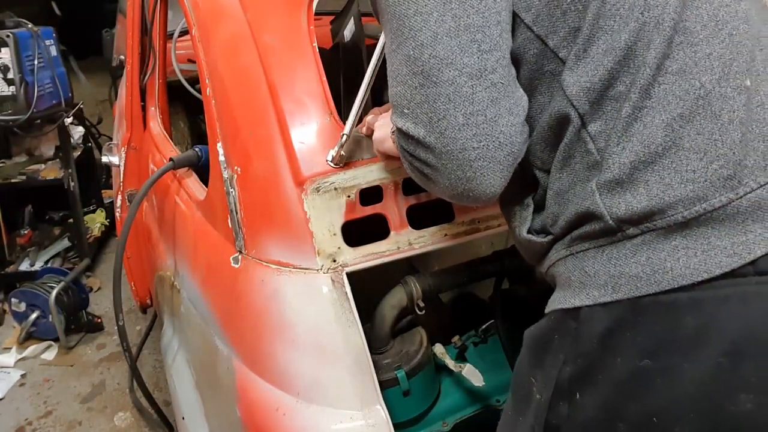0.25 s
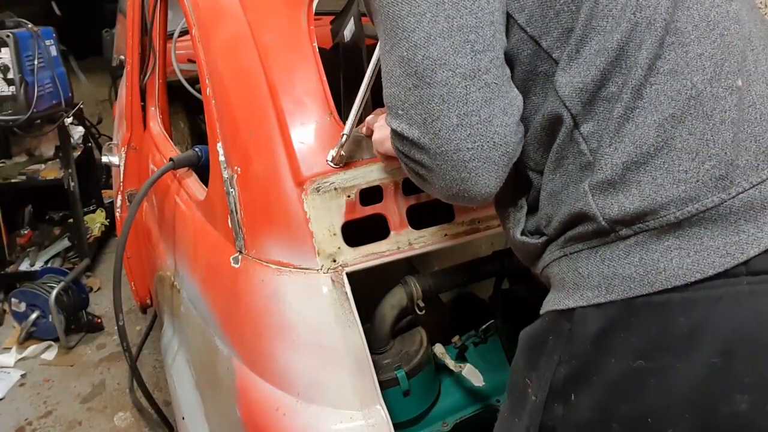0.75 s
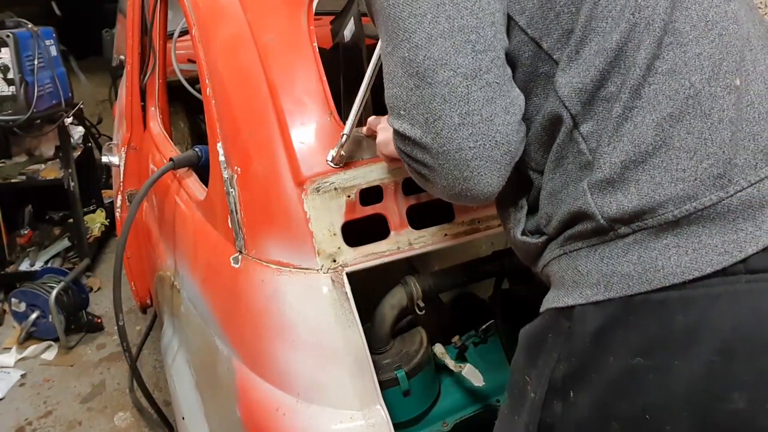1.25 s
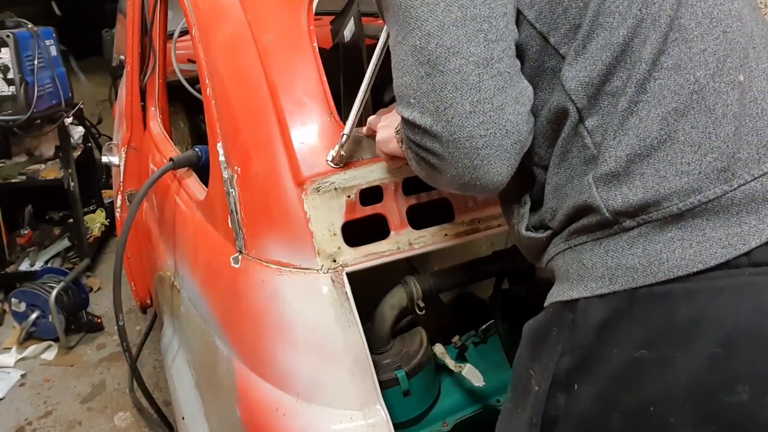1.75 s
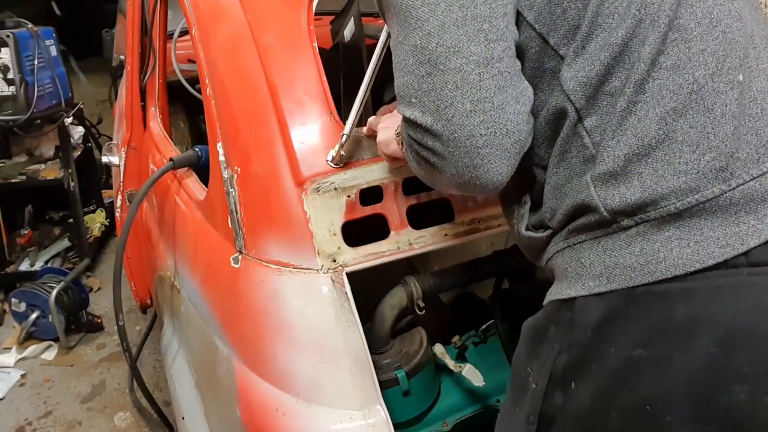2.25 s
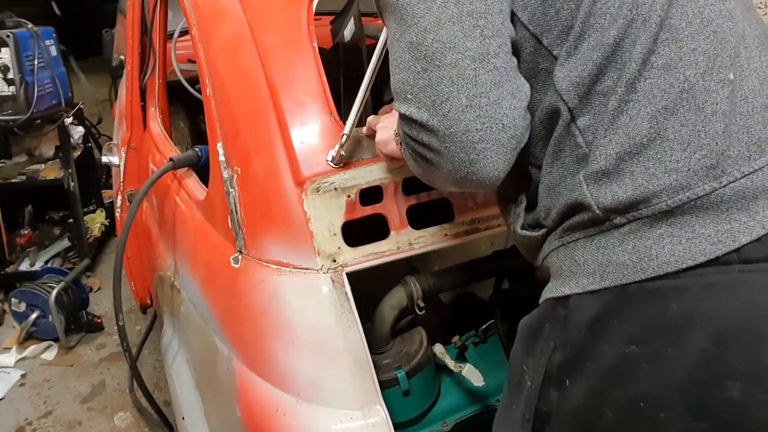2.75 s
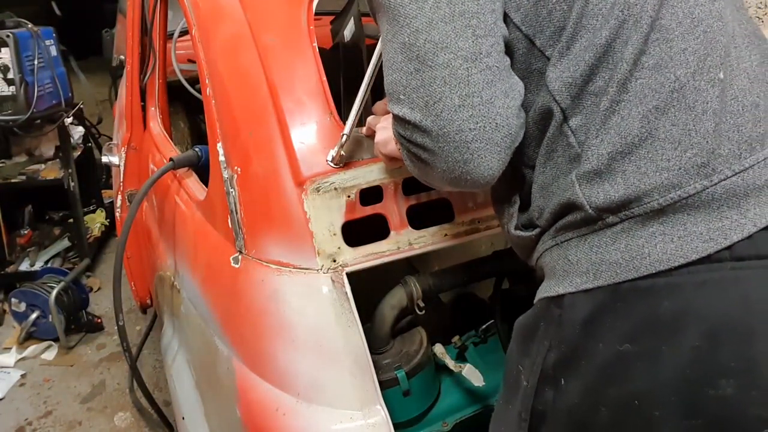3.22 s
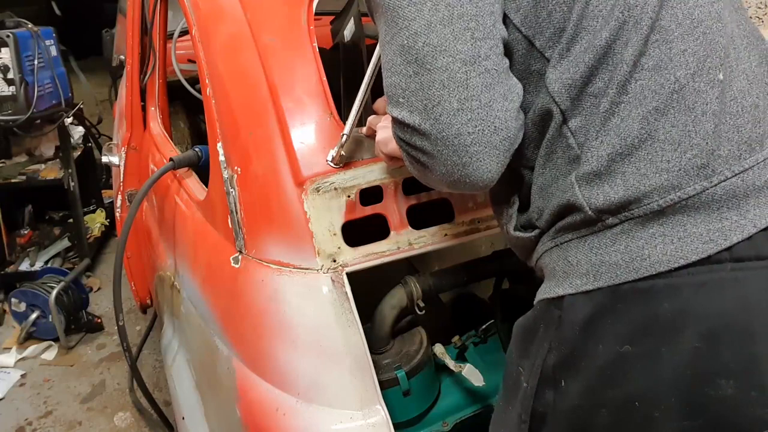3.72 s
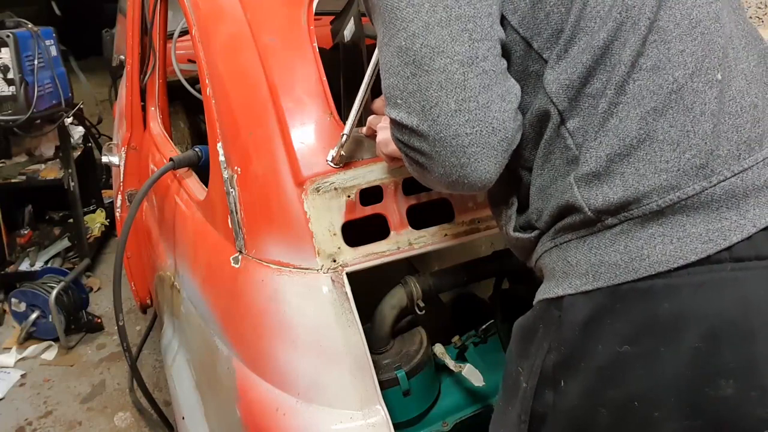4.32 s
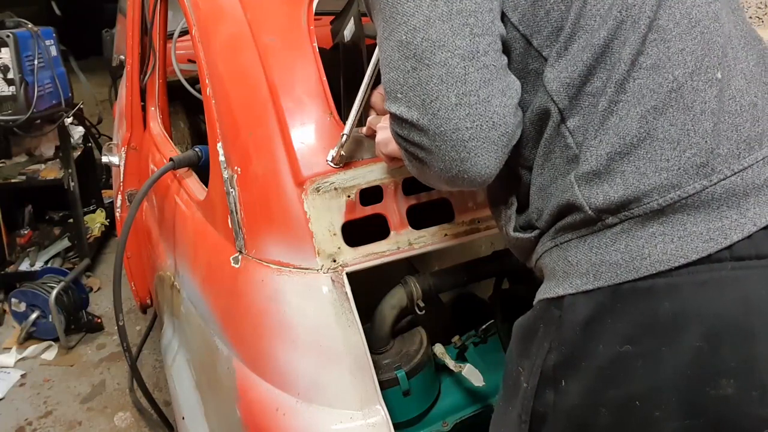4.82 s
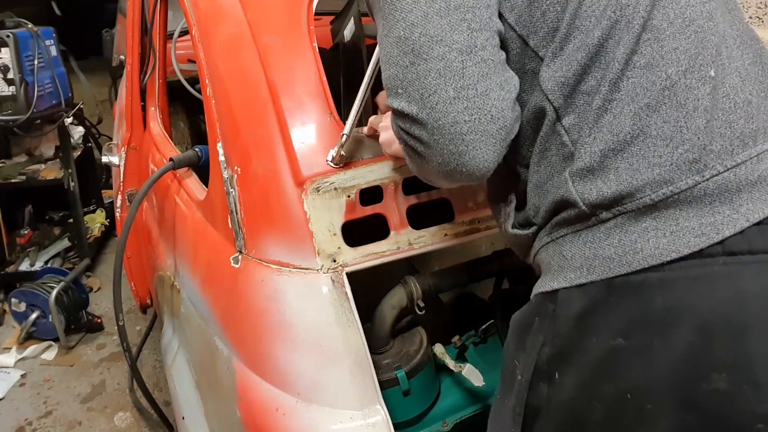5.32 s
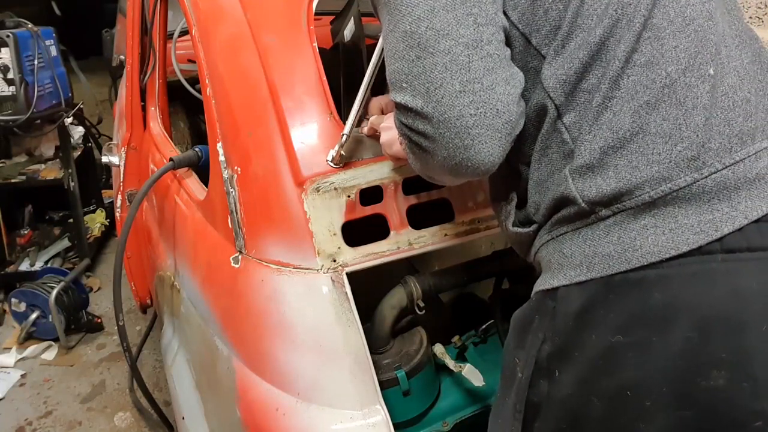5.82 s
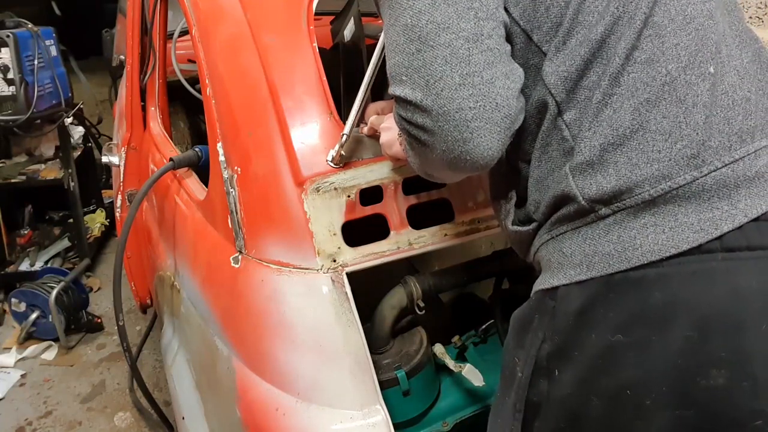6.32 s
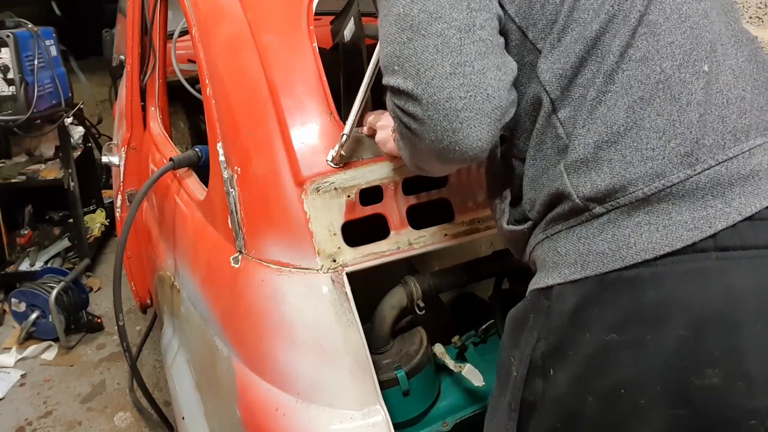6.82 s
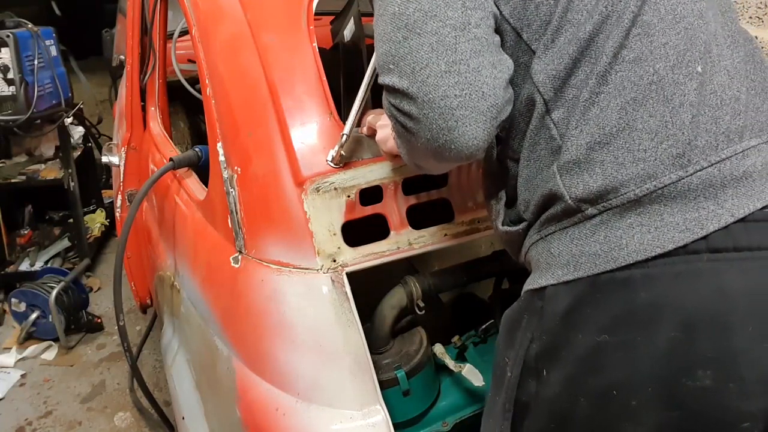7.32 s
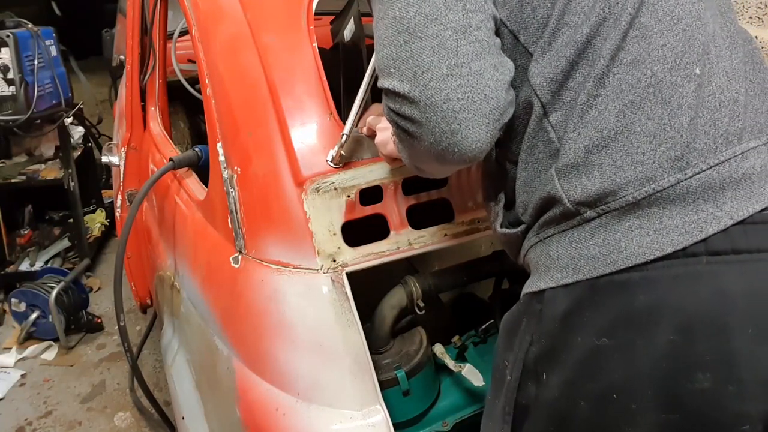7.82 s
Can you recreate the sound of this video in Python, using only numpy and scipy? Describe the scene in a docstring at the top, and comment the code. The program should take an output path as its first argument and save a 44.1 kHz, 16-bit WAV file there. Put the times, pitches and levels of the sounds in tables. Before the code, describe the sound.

Short dry strokes of a hard metal point stick and slip on thin steel, each with a crack or rasp and a brief boxy panel ring. They come in irregular clusters, separated by near-quiet gaps with only soft room air and low rumble. Weak scuffs lead to strong, fuller scrapes and a rapid stutter in the last second or so. Near stereo pickup indoors, a touch left of centre.

```python
"""Steel scribe on a car body

In a small workshop a steel scribe is worked along the edge of a sheet steel patch on a car body, a little left.
Its point sticks and slips in short strokes and snaps free with a crack; each slip is a push that rings the panel.
Filtered noise makes the rest: the car body shudders with the panel's low swing, over a low rumble
and a soft rush of workshop air, with a faint hiss that sinks away in the first second or so."""
import sys
import numpy as np
from scipy import signal
from scipy.fft import rfft, irfft
from scipy.io import wavfile
from scipy.ndimage import uniform_filter1d

SR = 44100
rng = np.random.default_rng(int(sys.argv[2]) if len(sys.argv) > 2 else 0)


def wrap_up_sound(samples):
    """Save the sound to the file named by the first command line argument, as 16-bit audio."""
    columns = np.atleast_2d(samples).T
    # keep every value between -1 and 1, then stretch to whole-number steps
    tamed = np.clip(columns, -1, 1)
    steps = np.round(tamed * 32767).astype(np.int16)
    wavfile.write(sys.argv[1], SR, steps)


N = 355446

# Likeness of left and right at the stereo microphone. Each row: frequency in Hz, coherence from 0 to 1.
COHERENCE = [(60, .93), (130, .94), (290, 0.88), (640, 0.53), (1300, 0), (2000, 0.21), (3100, 0.0084),
             (7000, 0.083), (15000, 0)]
# Colour of the low rumble, and of the car body's shudder. Each row: frequency in Hz, relative level in dB per Hz.
RUMBLE_SPECTRUM = [(10, -22.5), (25, -16.5), (50, 6), (70, -1), (95, 1), (140, -6), (250, -35),
                   (600, -66.5)]


def amp(db):
    """Decibels to gain."""
    return 10 ** (np.asarray(db) / 20)


def unit(x):
    """Scales a sound to energy 1."""
    return x / np.sqrt(np.sum(x ** 2) + 1e-20)


def read(points, hz):
    """Reads a table on a log-frequency axis."""
    f, value = np.transpose(points)
    return np.interp(np.log(hz + 1), np.log(f + 1), value)


def follow(curve):
    """A level curve of (s, dB) points as a gain for every sample."""
    return amp(np.interp(np.arange(N) / SR, *np.transpose(curve)))


def hump(hz, centre_hz, octaves):
    """A broad resonance of height 1."""
    return np.exp(-(np.log2(hz / centre_hz) / octaves) ** 2)


def add(mix, s, sound):
    """Adds a stereo sound at time s, cut off at the end of the mix."""
    part = mix[:, round(s * SR):][:, :sound.shape[1]]
    part += sound[:, :part.shape[1]]


def causal(gain_db, size=2048):
    """The minimum-phase impulse response with this gain: its energy comes as early as possible."""
    cepstrum = irfft(np.log(amp(gain_db)))
    half = len(cepstrum) // 2
    folded = np.r_[cepstrum[0], 2 * cepstrum[1:half], np.zeros(half)]
    return irfft(np.exp(rfft(folded)))[:size]


def pair(a, b, hz):
    """Two unrelated spectra become left and right, alike in the bass."""
    same = read(COHERENCE, hz)
    mid = np.sqrt((1 + same) / 2) * a
    side = np.sqrt((1 - same) / 2) * b
    return np.array([mid + side, mid - side])


def noise(spectrum):
    """Steady stereo noise of rms 1, coloured by a spectrum."""
    hz = np.fft.rfftfreq(N, 1 / SR)
    left, right = rfft(rng.standard_normal((2, N)))
    x = irfft(pair(left, right, hz) * amp(read(spectrum, hz)), N)
    return x / x.std()


def background(air_db=-65.5):
    """Low rumble of moving level, steady soft air, and a faint hiss that soon sinks away, all coloured noise."""
    # Each row of the two spectra: frequency in Hz, relative level in dB per Hz.
    air_spectrum = [(100, -3.5), (200, -6.5), (350, -4.5), (600, 1), (1000, 1), (1300, -2), (1600, -15),
                    (2100, -20.5), (2550, -20), (4000, -24.5), (6500, -24), (9000, -33.5), (12500, -21),
                    (15000, -45.5)]
    hiss_spectrum = [(300, -9), (650, 10.5), (1250, 17), (1700, -2), (2250, -3), (2520, 0.5), (3000, -6),
                     (6000, -1), (8000, -5), (9200, -0.5), (9650, -1), (10200, -3), (11500, 0),
                     (16000, -18)]
    # Rumble and hiss over time. Each row: time in seconds, rms level in dB.
    rumble_level = [(0, -62), (1.1, -69.5), (2.7, -61.5), (3.3, -58.5), (3.6, -65.5), (6.5, -66.5),
                    (8, -65.5)]
    hiss_level = [(0, -61.5), (.3, -64.5), (.45, -70), (.9, -69.5), (1.3, -102)]
    rumble = follow(rumble_level) * noise(RUMBLE_SPECTRUM)
    air = amp(air_db) * noise(air_spectrum)
    hiss = follow(hiss_level) * noise(hiss_spectrum)
    return rumble + air + hiss


def shudder(scribe, panel_hz=400, hardest_db=-46.5, db_per_db=0.57, settle_s=0.016):
    """The whole car body rumbles with the low swing of the panel, and settles after it."""
    lowpass = signal.butter(2, panel_hz, fs=SR, output="sos")
    swing = signal.sosfilt(lowpass, scribe.mean(0))
    keep = np.exp(-1 / (settle_s * SR))
    push = np.sqrt(signal.lfilter([1 - keep], [1, -keep], swing ** 2))
    return amp(hardest_db) * (push / push.max()) ** db_per_db * noise(RUMBLE_SPECTRUM)


def dense_ring(build_cycles=2.6, second_db=-35.02, second_stretch=0.71, size=32768):
    """Countless panel modes and wall echoes: the bass builds up slowly and dies last."""
    # Decay of panel and room together. Each row: frequency in Hz, time to fall by 60 dB in seconds.
    decay = [(120, 0.42), (300, 0.24), (700, .26), (2000, 0.22), (5000, 0.19), (10000, .18), (16000, 0.11)]
    hz, t, z = signal.stft(rng.standard_normal((2, size)), SR, nperseg=256)
    hz = hz[:, None]
    fall_db = -60 * t / read(decay, hz)
    fall = amp(fall_db) + amp(second_db + fall_db / second_stretch)  # the second, fainter part dies sooner
    build = 1 - np.exp(-(t + 0.0011) * (hz + 50) / build_cycles)
    ring = rfft(signal.istft(z * fall * build, SR, nperseg=256)[1][:, :size])
    ring /= np.sqrt(uniform_filter1d(abs(ring) ** 2, size=200, axis=1))  # every band carries the same energy
    fade = np.clip(np.linspace(3, -1, size), 0, 1)  # the last of the tail closes to silence
    return irfft(pair(*ring, np.fft.rfftfreq(size, 1 / SR))) * fade


def clear_modes(size=32768):
    """The clear modes of the panel: dying sines, met with another phase at every spot and at each ear."""
    # Each row: frequency in Hz, relative level in dB, time to fall by 60 dB in seconds.
    modes = [(173.7, -51.5, 0.54), (241.4, -49.5, 0.2), (304.8, -50, 0.46), (431, -60, 0.25),
             (526, -59.5, 0.97), (600, -53.5, 0.53), (760, -57.5, 0.7), (868, -48, 0.22), (1090, -47, 0.16),
             (1158, -55.5, 0.59), (1554, -40, .25), (1820, -53, 0.44), (1950, -47.5, 0.13),
             (2154, -32, 0.2), (2290, -64.5, 0.8), (2830, -46.5, 0.083), (3220, -55.5, 0.22),
             (3840, -47.5, 0.3)]
    t = np.arange(size) / SR
    out = np.zeros((2, size))
    phases = rng.uniform(-np.pi, np.pi, (len(modes), 2))
    for (hz, db, t60), (phase, apart) in zip(modes, phases):
        ears = np.array([[0], [apart * (1 - read(COHERENCE, hz))]])
        out += amp(db - 60 * t / t60) * np.sin(2 * np.pi * hz * t + phase + ears)
    return out


def spots(shared=0.24, direct=0.18, modes_db=-12.5, count=8):
    """Responses of several spots on the panel: the direct click, then a ring that is partly common to all."""
    common = dense_ring()
    responses = []
    for _ in range(count):
        ring = np.sqrt(shared) * common + np.sqrt(1 - shared) * dense_ring()
        response = ring + amp(modes_db) * clear_modes()
        response[:, 0] += direct
        responses.append(response)
    return responses


def radiate(force, response, s, db, sharp_db, boom_db, contact_hz, shaft_db,
            sharp_hz=3000, shaft_hz=3600, bass_hz=450, ripple_db=1.59, scribe_hz=1950):
    """The force rings a spot; edge hardness tilts the treble, and panel, contact and shaft resonances colour it."""
    # What the panel radiates for one slip. Each row: frequency in Hz, relative level in dB.
    panel = [(40, 0.5), (110, 6.5), (170, 15.5), (300, 26), (550, 23.5), (900, 24), (1900, 19.5),
             (3500, 14), (5500, 10.5), (8800, 3), (12000, 6), (15500, -1)]
    # The boom changes pitch as the point travels along the edge. Each row: time in seconds, pitch in Hz.
    boom_pitch = [(1.8, 190), (2.2, 247), (4.3, 212.5), (6, 303), (7, 325), (7.3, 257), (7.8, 230)]
    ring = signal.fftconvolve(unit(force)[None], response, axes=1)
    hz = np.fft.rfftfreq(4096, 1 / SR) + 1
    bass = 1 / (1 + (hz / bass_hz) ** 4)
    # the bass follows the push of the hand, however the single slips happen to fall
    power = (abs(rfft(ring, 32768)) ** 2).mean(0)
    steady = -10 * np.log10(uniform_filter1d(power, size=96)[::8] + 1e-9) * bass
    # higher up, a random ripple makes the colour of every event slightly uneven
    ripple = uniform_filter1d(rng.standard_normal(len(hz)), size=30)
    ripple = ripple_db * (1 - bass) * ripple / ripple.std()
    sharp = sharp_db * np.log(1 + (hz / sharp_hz) ** 2) / np.log(17)  # reaches sharp_db at four times sharp_hz
    boom = boom_db * hump(hz, np.interp(s, *np.transpose(boom_pitch)), octaves=1.226)
    # the contact spot rings more where it meets the scribe's own note
    contact_db = 5 + 3.5 * hump(contact_hz, scribe_hz, octaves=0.99)
    contact = contact_db * hump(hz, contact_hz, octaves=0.46)
    shaft = shaft_db * hump(hz, shaft_hz, octaves=0.42)
    colour = causal(db + read(panel, hz) + steady + ripple + sharp + boom + contact + shaft)
    return signal.fftconvolve(ring, colour[None], axes=1)


def stick_slip(t, slips_per_s, grit, uneven=0.55, spread_db=5.0, grit_s=0.0013):
    """Uneven slips of the point, each followed by a short spray of grit, over a steady scrape."""
    gap, size = rng.standard_normal((256, 2)).T
    gap_samples = np.exp(uneven * gap[1:]) * SR / slips_per_s  # slips_per_s sets the median gap
    at = np.r_[0, np.cumsum(gap_samples)].astype(int)
    inside = at < len(t)
    slips = np.zeros(len(t))
    slips[at[inside]] = amp(spread_db * np.clip(size, -2, 2))[inside]
    spray_level = signal.fftconvolve(slips, np.exp(-t / grit_s))[:len(t)] + 0.28  # 0.28 is the steady scrape
    spray = spray_level * rng.standard_normal(len(t))
    # grit is the share of the energy in the spray
    return np.sqrt(1 - grit) * unit(slips - slips.mean()) + np.sqrt(grit) * unit(spray)


def snaps(responses, crack=0.79):
    """The point breaks free with one crack and skids to a halt, its slips dying away."""
    # Each row: start in seconds, decay time of the skid in seconds, level in dB, sharpness in dB,
    # boom in dB, contact resonance in Hz, shaft resonance in dB.
    snap_rows = [(1.131, 0.0093, -32, -7.5, 9, 670, 8.5), (1.264, 0.013, -11.5, 2.5, 8, 9800, 5),
                 (1.745, 0.0081, -14.5, 16, 7.5, 277, 8.5), (2.151, 0.015, -36, -11, 23.5, 690, -12),
                 (2.356, .008, -45, 8, 10, 6240, 9), (2.594, 0.029, -27.5, -7.5, 0, 6200, -0.5),
                 (3.021, 0.065, -33.5, 0.5, 15, 720, -0.5), (3.125, 0.013, -34, 0, 17.5, 790, -1),
                 (3.166, 0.0085, -33.5, -9.5, 12.5, 1440, 0), (3.228, 0.029, -28, -19, 5.5, 1690, -7),
                 (3.762, 0.033, -27.5, 1, 16.5, 5560, 9.5), (3.8, 0.019, -22, 8, 8, 3020, 2),
                 (3.82, .0085, -14, 15.5, 11.5, 2130, 2), (4.006, 0.021, -31, -5.5, 22, 6720, -2),
                 (4.23, 0.015, -28, -1, 14, 7050, 12.5), (4.531, 0.045, -19, -4, 16, 2820, 0),
                 (4.589, 0.024, -11.5, 8, 3.5, 5980, 1.5), (5.614, 0.021, -51.5, 27.5, -5, 5900, -1),
                 (6.264, 0.022, -22, -5, -6.5, 1960, -4), (6.903, 0.022, -10, -21.5, 4, 2490, -4)]
    out = np.zeros((2, N))
    for k, (s, skid, *touch) in enumerate(snap_rows):
        t = np.arange(0, 4 * skid, 1 / SR)
        force = unit(np.exp(-t / skid) * stick_slip(t, slips_per_s=400, grit=0.62))
        force[0] += crack
        add(out, s, radiate(force, responses[k % len(responses)], s, *touch))
    return out


def judder(count=5, start_s=7.234, period_s=0.058, swell_s=0.014, fade_s=0.023):
    """The point sticks and jerks on at a steady rate: a run of like strokes under one arch of pressure."""
    jerks = []
    for k, arch in enumerate(np.hanning(count) ** 2):
        level_db = -15.5 + 1.5 * arch  # strongest midway
        touch = (0.5, 9.5, 1780, 7)  # sharpness dB, boom dB, contact Hz, shaft dB
        jerks.append((start_s + k * period_s, swell_s, fade_s, level_db, *touch))
    return jerks


def strokes(responses, curve=0.91):
    """The point is drawn over the steel: each stroke swells as the hand bears down, and fades as it lifts."""
    # Each row: start in seconds, swell in seconds, fade in seconds, level in dB, sharpness in dB,
    # boom in dB, contact resonance in Hz, shaft resonance in dB.
    stroke_rows = [(1.13, 0.021, 0.077, -14, -5.5, 12, 8300, 4.5),
                   (1.359, 0.0064, 0.15, -19.5, -6.5, 15.5, 600, 2),
                   (1.434, 0.046, 0.027, -24.5, -4, 17, 810, 1),
                   (1.744, 0.013, 0.034, -14.5, 12, 21.5, 6930, 6.5),
                   (1.866, 0.15, .06, -37, -26, 24.5, 574, -5), (2.009, 0.037, 0.013, -29, 2, 2, 6010, 5.5),
                   (2.164, 0.029, 0.091, -45, 2, 8, 7300, 2),
                   (2.324, 0.0041, .2, -35, -2.5, 16.5, 676, -6.5),
                   (2.544, 0.041, 0.25, -35.5, -1, 19.5, 600, -4),
                   (2.694, 0.093, 0.1, -33.5, -5, 17, 10000, 0.5),
                   (3.278, 0.028, 0.035, -22.5, -7.5, 17.5, 628, 0),
                   (3.31, .011, 0.022, -19, 2, 2.5, 1800, 2.5),
                   (4.238, 0.014, 0.026, -12.5, 0.5, 11, 13600, 5.5),
                   (4.606, 0.035, 0.012, -18.5, 12.5, 8.5, 220, 6),
                   (5.136, 0.023, 0.022, -41, 15, 16, 9180, 3), (5.366, .019, 0.031, -50, 4.5, -5, 6100, 7),
                   (5.668, 0.049, 0.044, -24, -14.5, 0, 4940, -7.5),
                   (5.789, 0.022, 0.033, -42.5, -12.5, 7.5, 1610, 3.5),
                   (6.0, 0.026, 0.07, -23, -42, 2.5, 332, -1.5),
                   (6.634, .031, 0.12, -25.5, -9, 6.5, 320, 2.5),
                   (6.911, 0.023, 0.079, -7, -12.5, 3.5, 1036, 4),
                   (6.934, 0.039, 0.066, -5.5, -12, 11, 1850, 6),
                   (7.555, 0.012, 0.045, -8.5, 0.5, -0.5, 6060, 5.5),
                   (7.612, 0.087, .025, 0, -14.5, -5, 837, 8.5), (7.694, .021, 0.026, -4.5, -7, 6, 780, -2),
                   (7.775, 0.065, 0.036, -16.5, -3.5, 3, 6100, 6.5)]
    out = np.zeros((2, N))
    for k, (s, swell, fade, *touch) in enumerate(list(stroke_rows) + judder()):
        t = np.arange(0, swell + fade, 1 / SR)
        pressure = np.interp(t, [0, swell, swell + fade], [0, 1, 0]) ** curve
        force = pressure * stick_slip(t, slips_per_s=230, grit=0.53)
        add(out, s, radiate(force, responses[k % len(responses)], s, *touch))
    return out


def scene(left_db=0.5):
    """The scribe, a little to the left, on the car body in the workshop."""
    responses = spots()
    scribe = strokes(responses) + snaps(responses)
    return scribe * amp([[left_db], [-left_db]]) + shudder(scribe) + background()


def record(dry, edge_hz=16050):
    """The band limit of the recorder: a steep low-pass without delay."""
    lowpass = signal.firwin(511, edge_hz, window=("kaiser", 9), fs=SR)
    return signal.oaconvolve(dry, lowpass[None], "same")


dry = scene()
out = record(dry)
wrap_up_sound(out)
```